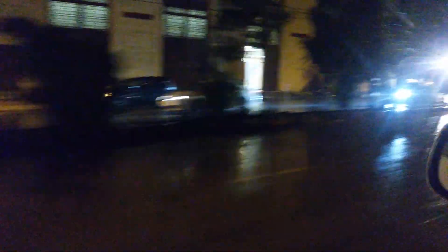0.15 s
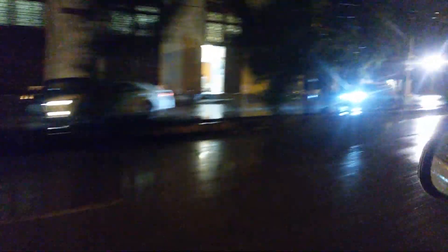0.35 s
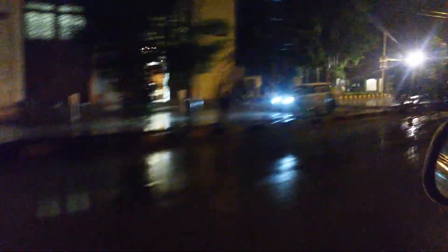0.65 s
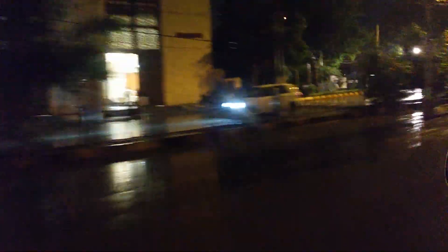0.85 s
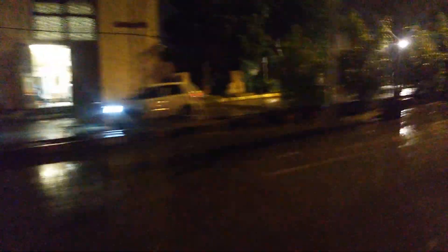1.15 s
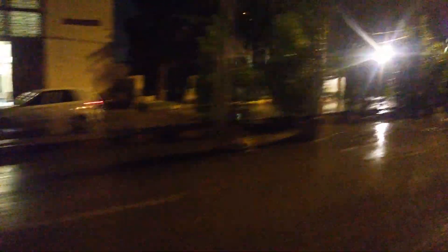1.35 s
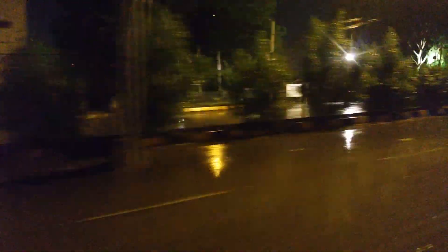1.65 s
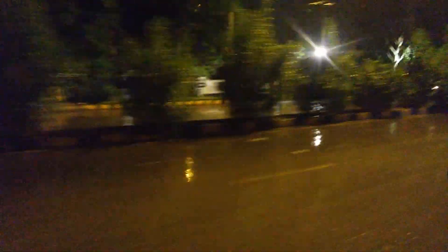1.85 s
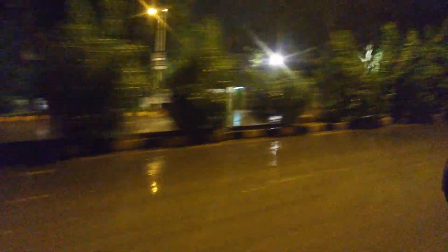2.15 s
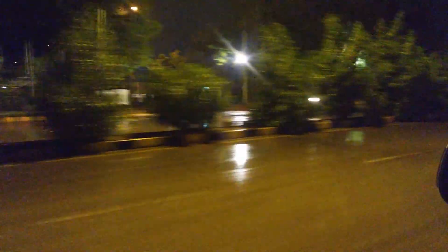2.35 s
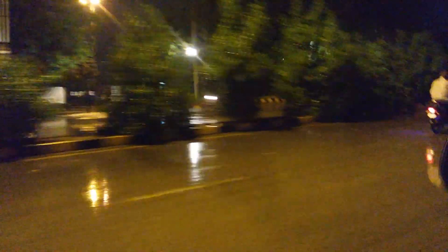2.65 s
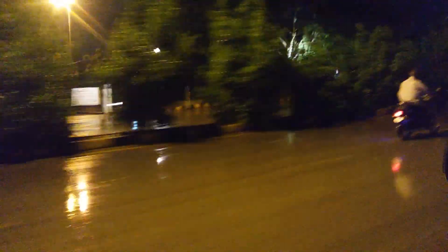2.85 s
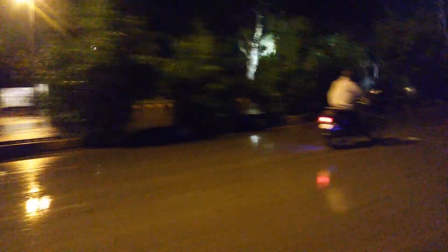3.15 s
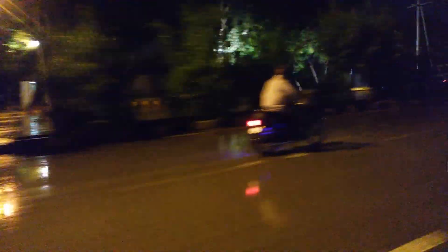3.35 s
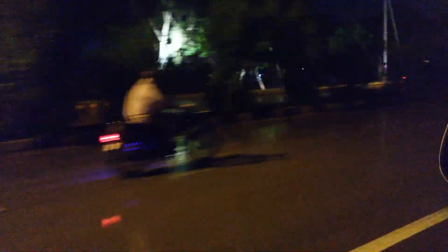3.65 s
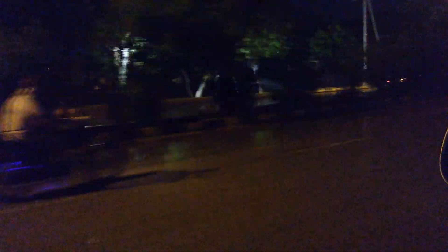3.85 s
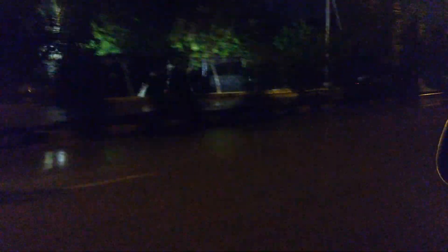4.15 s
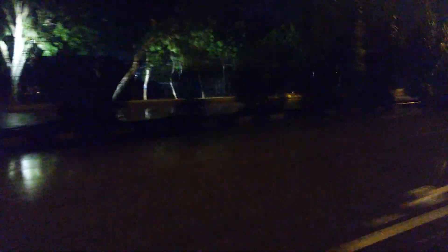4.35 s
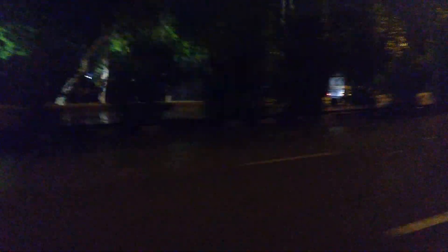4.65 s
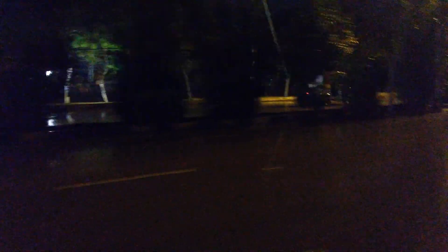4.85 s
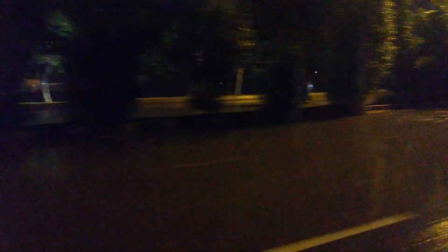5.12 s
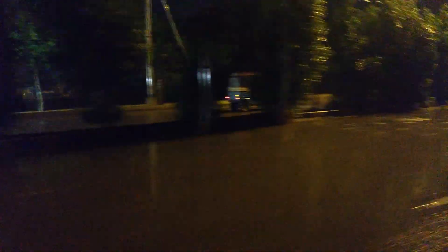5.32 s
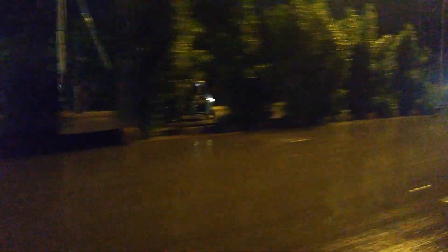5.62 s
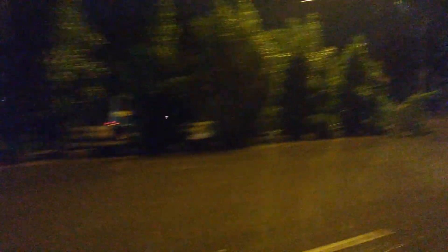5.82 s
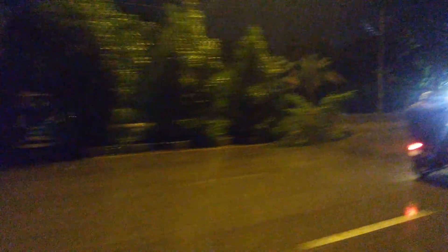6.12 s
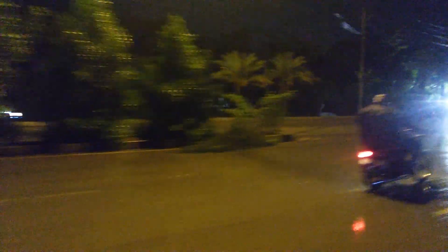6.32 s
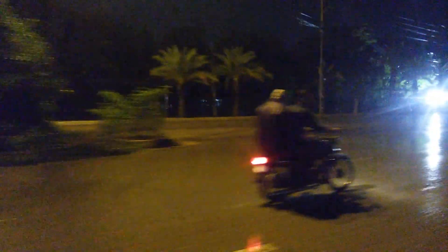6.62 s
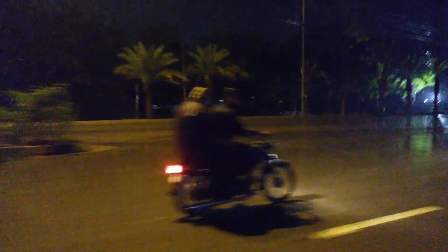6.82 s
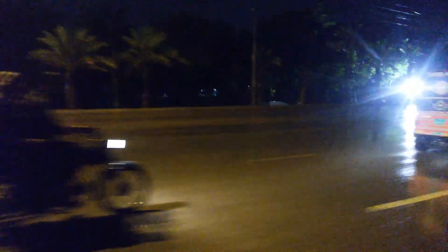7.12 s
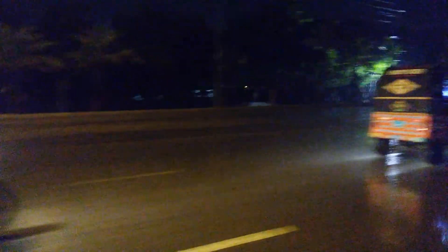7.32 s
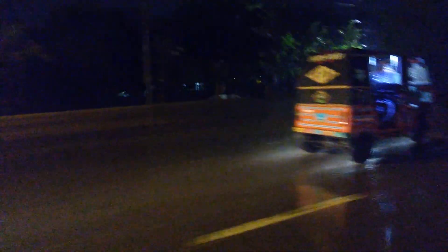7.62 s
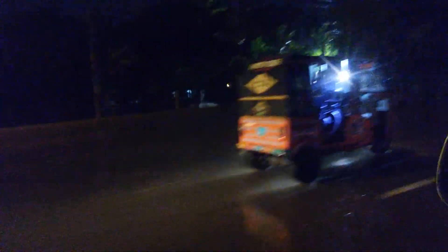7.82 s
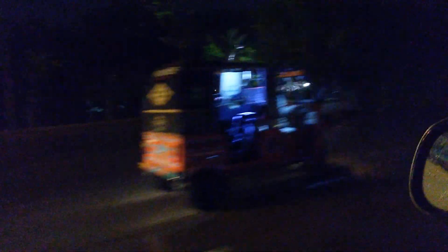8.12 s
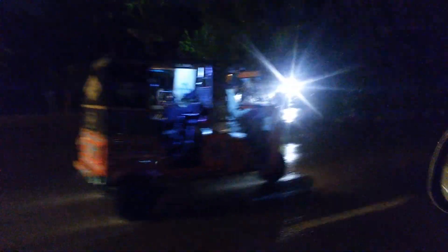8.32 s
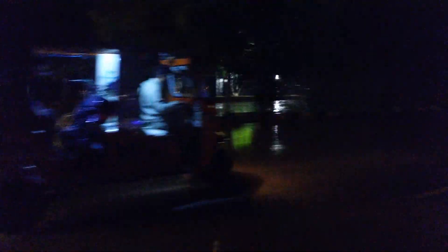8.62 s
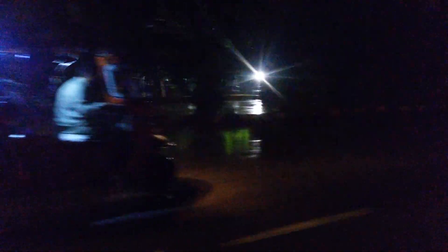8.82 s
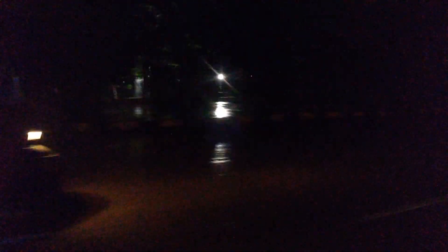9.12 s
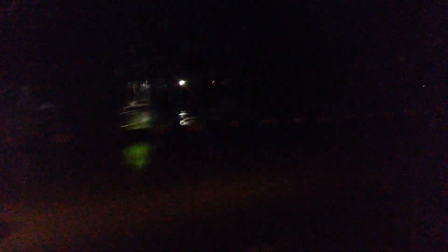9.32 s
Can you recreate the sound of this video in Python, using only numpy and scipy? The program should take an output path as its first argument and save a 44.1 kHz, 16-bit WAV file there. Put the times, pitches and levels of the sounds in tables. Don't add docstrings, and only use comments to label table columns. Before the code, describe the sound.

Wet-road driving heard very close and rough: air bursts slap and overload the microphone in quick clusters, with dry drop ticks and dense crackle inside them. Beneath runs continuous tyre spray, tread roar and dull rumble. After a short lull the gusts return, thinning gradually. A rapid small-engine putter then grows alongside, its valve gear clanking brightly and pulsing the hiss, still close when it ends.

```python
import sys
import numpy as np
from scipy import signal
from scipy.fft import rfft, irfft, next_fast_len
from scipy.io import wavfile
from scipy.ndimage import uniform_filter1d, map_coordinates

SR = 44100
rng = np.random.default_rng(int(sys.argv[2]) if len(sys.argv) > 2 else 0)


def inscribe(sig):
    pcm = np.round(np.clip(np.atleast_2d(sig).T, -1, 1) * 32767)
    wavfile.write(sys.argv[1], SR, pcm.astype(np.int16))


def convert_level_to_amplitude(level_db):
    exponent = np.asarray(level_db, float) / 20
    return 10 ** exponent


N = 417627


def unit(x):
    return x / np.sqrt(np.mean(x ** 2) + 1e-20)


def curves(rows):
    s, *columns = np.transpose(rows)
    return [np.interp(np.arange(N) / SR, s, column) for column in columns]


def wobble(rate):
    knots = rng.standard_normal(int(N * rate / SR) + 4)
    return map_coordinates(knots, [np.arange(N) * rate / SR])


def filtered(x, response):
    m = next_fast_len(N + 8192)
    return irfft(rfft(x, m) * response(np.fft.rfftfreq(m, 1 / SR)), m)[:N]


def rush(spectrum, patchy_db):
    z = signal.stft(rng.standard_normal(N + 512), nperseg=512)[2]
    field = uniform_filter1d(rng.standard_normal(z.shape), size=5, axis=0)
    field = uniform_filter1d(field, size=9, axis=1)
    x = signal.istft(z * convert_level_to_amplitude(patchy_db * unit(field)), nperseg=512)[1][:N]
    f, db = np.transpose(spectrum)
    return unit(filtered(x, lambda hz: convert_level_to_amplitude(np.interp(np.log(hz + 1), np.log(f + 1), db))))


def evened(x, size, share):
    power = np.abs(uniform_filter1d(x ** 2, size=size)) + 1e-3
    return unit(x / power ** (np.clip(share, 0, 1) / 2))


def powers(rows):
    low, high = np.zeros((2, N))
    for s, rise, fall, db, bright_db in rows:
        start = max(round((s - 4 * rise) * SR), 0)
        stop = min(round((s + 4 * fall) * SR), N)
        i = np.arange(start, stop)
        u = (i / SR - s) / np.where(i / SR < s, rise, fall)
        shape_db = -8.5 * np.abs(u) ** 1.51
        whole = 1 + convert_level_to_amplitude(2 * bright_db)
        low[i] += convert_level_to_amplitude(2 * (db + shape_db)) / whole
        high[i] += convert_level_to_amplitude(2 * (db + bright_db + 1.33 * shape_db)) / whole
    return np.array([low, high])


def rings(rows, cycles, gain_db):
    before, after = 400, 900
    s, db, hz = np.transpose(rows)[..., None]
    t = np.arange(-before, after) / SR
    u = t * hz / cycles
    shape = np.exp(np.where(u < 0, -12 * u * u, -2.5 * np.abs(u)))
    wave = convert_level_to_amplitude(db + gain_db) * shape * np.sin(2 * np.pi * (hz * t + rng.random(s.shape)))
    at = (np.round(s * SR) + np.arange(before + after)).astype(int)
    return np.bincount(at.ravel(), wave.ravel(), N + 2000)[before:N + before]


def eddies():
    # (time [s], fall [s], peak [dB], bright part [dB])
    slams = [(0.167, 0.02, 1.5, -1), (.311, 0.0097, -13, -12), (0.433, .03, -7.5, -3),
             (0.503, 0.0077, -2, -9), (0.67, 0.011, -6.5, -1), (.782, 0.023, -7, -20),
             (.899, 0.018, -14, -20), (1.052, 0.028, 3, 2.5), (1.229, 0.021, -10, -6),
             (1.61, 0.0083, -0.5, -1.5), (1.793, 0.017, -4.5, -3), (1.888, 0.013, -4.5, -4),
             (2.054, 0.025, -7, -12), (2.099, 0.018, 0.5, 0.5), (2.187, 0.018, -4.5, -9),
             (2.484, 0.026, -1, -6.5), (2.873, 0.012, -9.5, -13), (2.926, 0.024, -0.5, -4),
             (3.33, 0.034, 0.5, -2.5), (4.289, 0.01, -8, -13), (5.679, 0.037, 2, -7),
             (5.855, 0.014, -10, -4), (6.172, 0.0097, -1.5, 0), (6.475, 0.033, -15.5, -1),
             (6.906, 0.026, -4.5, -7.5), (7.043, 0.014, -3, -7), (7.26, 0.024, -7.5, -4),
             (7.828, 0.015, -9.5, -3), (8.92, 0.017, -5, -15.5), (9.073, 0.019, -6.5, 8.5)]
    # (time [s], rise [s], peak [dB], bright part [dB])
    swells = [(.209, 0.011, -3.5, -3), (.357, 0.026, -2.5, -10), (0.401, 0.014, -2.5, -15),
              (.656, 0.016, -8.5, -10), (.881, 0.014, -13.5, -9), (1.146, 0.025, -6.5, -16),
              (1.328, 0.018, -3, -9), (1.354, 0.018, -7, -25), (1.496, 0.02, -3, -5.5),
              (2.46, 0.039, -10.5, -7), (2.542, .034, -5.5, -6), (2.608, 0.024, -3.5, -6),
              (2.785, 0.0045, -1, -6), (2.819, 0.027, -3.5, -7), (3.135, 0.024, -12.5, 2),
              (3.302, 0.024, 1.5, -2), (3.559, 0.019, -6, -7.5), (4.561, 0.0082, -2.5, -2.5),
              (4.589, 0.011, -5, -20), (4.895, 0.016, -10.5, -9), (5.243, 0.013, -6, -2),
              (5.275, 0.019, -7.5, -12), (5.762, 0.048, -3.5, -4.5), (5.882, 0.025, -7, -2),
              (6.335, 0.019, -0.5, -5.5), (7.108, 0.028, -12.5, -4), (7.58, 0.0086, -4, 4),
              (8.397, 0.014, -11, -6), (8.834, 0.059, -16, -21), (9.208, 0.015, -7.5, -11),
              (9.24, 0.009, -5.5, -13)]
    # (time [s], peak [dB], bright part [dB])
    puffs = [(0.821, -3, -18), (1.009, -7.5, -17), (1.182, -3, 0), (1.284, -3, -16), (1.676, -12, -9),
             (1.722, 1, 1), (1.813, -5.5, -7), (2.291, -9.5, -8), (2.425, 4, -0.5), (3.15, -5.5, -1),
             (3.175, -5.5, -8), (3.4257, 0.5, -0.5), (4.142, -22, -18), (4.206, -6.5, -8.5),
             (4.265, -5, -11.5), (4.531, 2, -16), (4.78, -5, 0), (4.816, -5.5, -23), (5.071, -5, -11),
             (5.089, -3.5, -7), (5.538, 2, -1), (5.619, -8, -11), (5.803, -2.5, -8), (6.084, -7, -23),
             (7.07, -8, -8.5), (7.406, -8, -6), (7.531, -9, -2), (8.7, -6.5, -13.5), (8.72, -5, -26),
             (8.952, -9.5, -25)]
    # (time [s], peak [dB])
    flutters = [(0.034, -13.5), (.083, -21.5), (.125, -14), (.598, -16.5), (1.426, -11), (1.937, -10.5),
                (2.977, -19.5), (4.18, -19), (4.324, -14), (4.407, -14.5), (4.843, -12), (4.95, -13.5),
                (5.145, -11.5), (5.636, -12), (5.82, -10.5), (5.97, -12), (6.279, -18), (6.447, -15),
                (6.588, -13.5), (6.7, -22), (6.75, -20.5), (7.335, -13), (7.366, -16.5), (7.43, -10),
                (7.763, -14.5), (8.362, -16), (8.55, -17.5), (9.024, -21.5), (9.052, -9.5), (9.355, -12)]
    rows = [(s, 0.0052 + 0.067 * fall, fall, db, bright) for s, fall, db, bright in slams]
    rows += [(s, rise, 0.01 + 0.22 * rise, db, bright) for s, rise, db, bright in swells]
    rows += [(s, 0.0066, 0.0087, db, bright) for s, db, bright in puffs]
    rows += [(s, 0.014, 0.014, db, -10) for s, db in flutters]
    return rows


def buffeting(low, high):
    # (frequency [Hz], density [dB per Hz])
    thump_spectrum = [(50, -60), (120, -14), (200, -3.5), (280, -2.5), (450, -6.5), (800, -20.5),
                      (2000, -62)]
    # (frequency [Hz], density [dB per Hz])
    rasp_spectrum = [(200, -21), (500, 1), (800, -0.5), (1400, -8), (2500, -20.5), (5000, -28), (9000, -92)]
    # (frequency [Hz], density [dB per Hz])
    boom_spectrum = [(15, -29), (40, -15), (110, -3.5), (170, -8.5), (400, -68)]
    # (time [s], peak [dB])
    heaves = [(.171, -20), (.373, -19), (.434, -23), (.674, -20.5), (.77, -21.5), (.907, -26), (1.056, -18),
              (1.195, -21.5), (1.297, -16.5), (1.429, -24), (1.478, -20), (1.612, -25.5), (1.717, -27),
              (1.898, -23.5), (1.944, -26), (2.103, -20), (2.474, -21.5), (2.819, -39), (2.926, -27),
              (3.124, -16), (3.295, -38), (3.434, -27), (3.547, -23), (4.268, -21.5), (4.527, -23.5),
              (4.816, -21), (4.977, -26), (5.246, -25.5), (5.43, -38), (5.537, -22.5), (5.675, -21.5),
              (5.724, -23), (5.853, -18), (6.165, -36), (6.307, -34), (6.482, -19), (6.581, -23),
              (6.911, -19.5), (7.369, -25), (7.585, -33), (7.822, -25), (8.364, -33), (8.705, -30),
              (8.829, -26), (8.944, -25), (9.059, -36), (9.198, -34)]
    heave_s = 0.017
    thump = evened(rush(thump_spectrum, patchy_db=4.5), size=260, share=0.79)
    rasp = evened(rush(rasp_spectrum, patchy_db=1.5), size=130, share=0.21) * convert_level_to_amplitude(3.2 * wobble(260))
    boom = evened(rush(boom_spectrum, patchy_db=1.5), size=900, share=1.0)
    t = np.arange(N) / SR
    lull_db = 6.5 * ((t > 3.1) & (t < 4.12))
    pump_db = -34 - uniform_filter1d(lull_db, size=4000)
    pushes = powers([(s, heave_s, heave_s, db + 5.5, -60) for s, db in heaves])[0]
    deep = convert_level_to_amplitude(2 * pump_db) + pushes
    return convert_level_to_amplitude(-1.5) * np.sqrt(low) * thump + convert_level_to_amplitude(-1.0) * np.sqrt(high) * unit(rasp) + np.sqrt(deep) * boom


def snaps():
    # (time [s], peak [dB])
    jumps = [(0.162, 7), (0.403, -10), (0.4315, -4.5), (0.498, -9), (0.6703, -5), (1.0474, 3.5),
             (1.313, -4.5), (1.725, -5.5), (1.7907, -3), (2.095, 5.5), (2.424, -7), (2.48, -1.5),
             (2.499, -1.5), (2.534, 0), (2.7903, -6), (2.803, 0.5), (2.927, 1), (3.298, 0), (3.302, 0.5),
             (3.3323, -1), (3.555, -6), (4.561, -4), (5.0843, -19), (5.2386, -3), (5.5346, 0.5),
             (5.6794, 1.5), (5.6994, -4), (6.169, -5), (6.32, -5.5)]
    out, t = np.zeros(N + 600), np.arange(600) / SR
    ragged = rush([(400, -14), (1200, 11), (2500, 0.5), (4500, 1.0), (9000, -48.0)], patchy_db=2.0)
    for (s, db), (pitch, phase) in zip(jumps, rng.random((len(jumps), 2))):
        start = round(s * SR)
        hz = 3200 * 2 ** (.8 * (pitch - .5)) * np.exp(-t / 0.00161) + 900
        swing = convert_level_to_amplitude(-60 * t / 0.027) * np.sin(2 * np.pi * (np.cumsum(hz) / SR + phase))
        tail = 0.61 * convert_level_to_amplitude(-60 * t / 0.023) * ragged[start:][:600]
        onset = 1 - np.exp(-t / 0.00094)
        out[start:][:600] += convert_level_to_amplitude(db - 0.5) * onset * (swing + tail)
    return out[:N]


def cracks():
    # (time [s], peak [dB], pitch [Hz])
    tears = [(0.1791, -14, 1500), (0.2087, -10, 1200), (0.3934, -5, 1400), (0.4442, -6, 1600),
             (1.0414, -5, 1300), (1.0563, 7, 1500), (1.0665, -11, 1400), (1.0749, -5, 1590),
             (1.181, -14, 1300), (1.1864, -4, 1200), (1.3225, -7, 1500), (1.6082, -1, 1300),
             (1.7195, -8, 1200), (1.8034, -3, 1500), (1.8093, -14, 1700), (1.8967, -7, 1200),
             (2.1109, -12, 1500), (2.4312, -8, 1700), (2.4919, -4, 1400), (2.4963, 7, 1300),
             (2.8128, -10, 1700), (2.8213, -5, 1600), (2.9192, 0, 1200), (2.9423, -9, 1500),
             (3.1714, -10, 1400), (3.2881, -9, 1300), (3.3105, -2.5, 1600), (3.3186, -16, 1600),
             (3.3422, 2, 1700), (4.2661, 0, 1500), (4.5272, 3.5, 1390), (4.7729, -8, 1390),
             (4.7791, -7, 1270), (5.0751, -1, 1290), (5.2466, 0, 1780), (5.2673, -5, 1200),
             (5.5411, -15, 1500), (5.6895, -13, 1400), (5.7585, 0, 1600), (5.7683, -3, 1300),
             (6.3325, -21, 1600), (6.9174, -16, 1400), (6.9317, -19, 1400), (6.9391, -4, 1190),
             (7.2596, -19, 1600), (7.2661, -18, 1400), (7.4022, -13, 2000), (7.5333, -9, 1600),
             (7.826, -20, 1600), (7.8314, -18, 1700), (8.527, -6, 2100), (8.9257, -4, 1500),
             (8.9546, -6, 1500), (9.0224, -6, 2100), (9.0533, -9, 1600), (9.0697, -21, 1600),
             (9.076, -23, 1400), (9.0818, -9, 1600), (9.196, -7, 1600), (9.2366, -6, 1700)]
    return rings(tears, cycles=1.5, gain_db=4.0)


def knocks():
    # (time [s], peak [dB])
    dull = [(0.062, -16), (0.313, -10), (0.45, -7), (0.899, -8), (1.067, -2), (1.677, -11), (1.772, -18),
            (1.791, -5), (2.46, -12), (3.554, -19), (3.588, -15), (4.142, -9.5), (4.177, -11), (4.191, -14),
            (4.843, -20), (4.964, -14), (5.907, -14), (6.279, -18), (6.697, -17), (7.375, -18),
            (7.456, -16), (8.199, -20), (8.236, -22), (8.334, -16), (8.531, -16), (9.052, -10),
            (9.122, -18), (9.156, -25), (9.364, -16)]
    # (time [s], peak [dB], pitch
    # [Hz])
    jolts = [(.2085, 8, 880), (.8178, -3.5, 695), (.8245, -3, 550), (.896, -16, 450), (.902, -16, 450),
             (1.32, 5.5, 800), (1.6075, -12, 800), (1.884, -1, 800), (2.87, -10, 900), (3.3195, -5, 3500),
             (3.4293, 1, 2650), (3.556, -0.5, 750), (4.526, 8, 800), (5.0675, -19, 800), (5.2375, 6, 940),
             (5.745, -15, 900), (5.853, -3, 448), (6.17, 1, 604), (6.4, -3, 3600), (6.918, -2, 900),
             (7.266, -11, 900)]
    knock_hz = 314
    thuds = rings([(s, db, knock_hz) for s, db in dull], cycles=1.8, gain_db=6.5)
    return thuds + rings(jolts, cycles=1.5, gain_db=3.0)


def crackle(low):
    hits_per_s, top_hz = 380, 3000
    at = rng.integers(0, N, int(hits_per_s * N / SR))
    sign, strength = rng.random((2, len(at)))
    level = convert_level_to_amplitude(6.5 + 10 * strength) * np.sqrt(np.minimum(low[at], .5))
    hits = np.bincount(at, np.sign(sign - .5) * level, N)
    return filtered(hits, lambda hz: 1j * hz / (500 + 1j * hz) / (1 + 1j * hz / top_hz) ** 2)


def tyres(beat, wind):
    # (time [s], level [dB])
    road = [(0, -22.5), (.3, -21), (.56, -27.5), (.61, -20.5), (.87, -23), (1.27, -19.5), (1.6, -25),
            (2.2, -22.5), (2.55, -24), (3.2, -22.5), (4.09, -27), (4.11, -23), (4.75, -24), (5.45, -24.5),
            (6.0, -23.5), (7.5, -18.5), (8.1, -20), (9.47, -19.5)]
    # (time [s], level [dB])
    alongside = [
        (2.6, -1),
        (3.3, 1.5),
        (5.4, 0.5),
        (6.0, 3),
        (6.4, -0.5),
        (6.6, 2),
        (7.3, 0),
        (8.25, 5),
        (9.47, 3),
    ]
    # (frequency [Hz], density [dB per Hz])
    spray_spectrum = [(2000, -21.5), (3200, -33), (4100, -7.5), (4550, -1), (5200, -2), (7000, -14.5),
                      (9000, -23), (10500, -18.5), (11800, -24), (13200, -18), (14000, -38), (15000, -69)]
    tread_spectrum = [(350, -12.5), (700, -8), (900, -9.5), (1200, -1.5), (1550, -5.5), (1900, -3.5),
                      (2400, -2.5), (2900, -5), (3600, -6), (4200, -11), (6000, -34)]
    rumble_spectrum = [(40, -46), (120, -4.5), (200, -1), (300, 0), (430, -4.5), (600, -14.5), (800, -14),
                       (1050, -18.5), (1800, -95)]
    tread_db, = curves(road)
    spray_db = tread_db - 0.97 + curves(alongside)[0]
    span_s = 0.12
    wind_db = 10 * np.log10(np.abs(uniform_filter1d(wind, size=int(span_s * SR))) + 0.0011)
    rumble_db = -23.5 + 0.27 * (wind_db - wind_db.mean())
    sway = wobble(7.8)
    droplets = convert_level_to_amplitude(0.2 * wobble(60) + 0.35 * wobble(300))
    spray = convert_level_to_amplitude(spray_db + 0.38 * sway + beat) * unit(droplets * rush(spray_spectrum, patchy_db=2.0))
    tread = convert_level_to_amplitude(tread_db + 1.0 + 0.5 * sway + 0.089 * beat) * rush(tread_spectrum, patchy_db=1.5)
    body = evened(rush(rumble_spectrum, patchy_db=3.5), size=500, share=0.22)
    return spray + tread + convert_level_to_amplitude(rumble_db + 0.96 * wobble(25)) * body


def engine():
    # (time [s], exhaust [dB], clatter depth [dB], valve tick [dB])
    putter = [
        (6.0, -55, 0., -50),
        (6.5, -38, 1.2, -32),
        (7.1, -32, 1.2, -31),
        (7.5, -29, 1.5, -28),
        (7.9, -22, 1.4, -31),
        (8.7, -22, 1.3, -32),
        (9.47, -23.5, 1.3, -32),
    ]
    # (time [s], rate [Hz])
    firing = [
        (7.5, 30.87),
        (7.9, 30.6),
        (8.2, 30.6),
        (8.5, 30.33),
    ]
    # (frequency [Hz], width [Hz], level [dB])
    exhaust = [(135, 70, -14), (245, 22, -5), (276, 22, 1), (308, 22, -4), (340, 22, -7), (440, 30, -7),
               (877, 50, -12)]
    level_db, depth_db, tick_db = curves(putter)
    turns = np.cumsum(curves(firing)[0]) / SR + .96
    at = np.flatnonzero(np.diff(np.floor(turns)))
    first, second = rng.standard_normal((400, 2))[:len(at)].T
    pulses, taps = np.zeros((2, N))
    pulses[np.clip(at + (5 * first).astype(int), 0, N - 1)] = convert_level_to_amplitude(1.5 * second)
    taps[np.clip(at + 130 + (40 * second).astype(int), 0, N - 1)] = convert_level_to_amplitude(3 * first)

    def resonance(f, centre, width):
        return 1j * f * width / (centre * centre - f * f + 1j * f * width)

    def pipe(f):
        total = sum((-1) ** k * convert_level_to_amplitude(db) * resonance(f, c, w) for k, (c, w, db) in enumerate(exhaust))
        return total / (1 + 1j * f / 1500) ** 2

    muffled = filtered(pulses, pipe)
    metal = rush([(3500, -23), (4700, 1.0), (5300, 6.5), (6200, 2.0), (7600, -9.5), (9000, -50.0)],
                 patchy_db=7.5)
    rattle = uniform_filter1d(signal.lfilter([1], [1, -.988], taps), size=24) * metal
    beat = np.cos(2 * np.pi * (turns - .12)) + 0.089 * np.cos(4 * np.pi * (turns - .1))
    facing = np.exp(-((np.arange(N) / SR - 7.85) / .4) ** 2)
    panel = convert_level_to_amplitude(-30) * facing * unit(filtered(pulses, lambda hz: resonance(hz, 870, 70) ** 2))
    return convert_level_to_amplitude(level_db) * unit(muffled) + panel + convert_level_to_amplitude(tick_db) * unit(rattle), beat * depth_db


def clanks():
    # (time [s], peak [dB], pitch [Hz])
    strokes = [(6.548, -17, 5250), (6.58, -11, 5340), (6.742, -16, 5570), (6.774, -23, 5500),
               (6.87, -27, 6720), (6.937, -21, 5510), (7.033, -17, 5510), (7.169, -17, 4570),
               (7.2, -23, 4620), (7.261, -16, 4660), (7.33, -20, 4600), (7.362, -15, 4530),
               (7.388, -22, 6720), (7.42, -21, 6720), (7.484, -22, 7300), (7.52, -16, 5840),
               (7.526, -15, 4860), (7.58, -25, 5900), (7.615, -14, 5900), (7.68, -14, 5700),
               (7.843, -15, 5050), (7.975, -15, 4670), (8.011, -16, 4650), (8.107, -15, 4740),
               (8.271, -12, 5800), (8.301, -12, 4970), (8.6, -10, 4910), (8.726, -9, 5050),
               (8.892, -12, 5130), (8.995, -10, 4800), (9.356, -9, 5300)]
    on_cover = [row for row in strokes if 4500 < row[2] < 4800]
    return rings(strokes, cycles=15, gain_db=8.0) + rings(on_cover, cycles=70, gain_db=-7.0)


def ticks():
    # (time [s], peak [dB])
    drops = [(0.165, -9), (0.856, -7), (1.05, 4), (1.3225, -17.5), (1.7925, -21), (2.094, -13),
             (2.423, -13), (2.5, -14), (2.805, -18), (2.928, -17), (3.304, -15), (3.3425, -18), (3.429, 3),
             (5.535, -17), (6.4, -8), (6.621, -14)]
    s, db = np.transpose(drops)
    blows = np.bincount(np.round(s * SR).astype(int), convert_level_to_amplitude(db + 8), N)
    return filtered(blows, lambda hz: 1j * hz / (1500 + 1j * hz) / (1 + 1j * hz / 6000))


def scene():
    putter, beat = engine()
    low, high = powers(eddies())
    air = buffeting(low, high) + snaps() + cracks() + knocks() + crackle(low)
    return (air + tyres(beat, low) + putter + clanks() + ticks())[None]


def thinned(x):
    # (start [s], end [s], share of lines kept [0-1])
    spare = [(0, .15, .04), (.3, .7, .02), (2.2, 3.2, .008), (3.6, 4.2, .04), (4.2, 5.5, .012),
             (5.9, 6.8, .03), (6.8, 7.05, .03), (7.05, 7.43, .13), (7.6, 8.3, .016), (8.1, 9.6, .03),
             (8.4, 9.4, .13)]
    hz, t, z = signal.stft(x, SR, window="cosine", nperseg=2048)
    power = np.abs(z) ** 2
    usual = uniform_filter1d(uniform_filter1d(power, size=24, axis=1), size=5, axis=2)
    usual = np.abs(usual)
    extra = uniform_filter1d(sum(more * ((t > a) & (t < b)) for a, b, more in spare), size=9)
    luck_db = 6 * rng.standard_normal((65, len(t))).repeat(16, 0)[:len(hz)]
    share = (.006 + extra) * convert_level_to_amplitude(luck_db)
    share = share / (1 + (power.sum(1) / convert_level_to_amplitude(2 * -12.5)) ** 2)
    strict = np.interp(hz, [7600, 8600, 9600, 11800, 12800, 13500, 14000],
                       [0, .3, .8, 1.6, 1, 1.2, 6])[:, None]
    strict = strict + 20 * np.outer(hz > 12100, (t > 7.53) & (t < 8.1))
    keep = power >= -np.log(np.clip(share, 1e-4, 1)) * strict * usual
    return signal.istft(z * keep, SR, window="cosine", nperseg=2048)[1][:, :N]


def holed(x):
    treble_hz = 8800
    hz, t, z = signal.stft(x, window="cosine", fs=SR, nperseg=256)
    power = np.abs(z) ** 2
    usual = np.abs(uniform_filter1d(uniform_filter1d(power, size=9, axis=1), size=5, axis=2))
    keep = (power >= .9 * usual) | (hz < treble_hz)[:, None]
    gain = convert_level_to_amplitude(-2.0 * (hz > treble_hz))[:, None]
    return signal.istft(gain * z * keep, window="cosine", fs=SR, nperseg=256)[1][:, :N]


def band_limit(x):
    return signal.sosfilt(signal.butter(12, 14560, fs=SR, output="sos"), x)


def record(dry):
    # (time [s], length [s])
    short_frames = [(.16, .016), (.28, .022), (.402, .028), (.834, .03), (.897, .023), (1.043, .03),
                    (2.094, .013), (2.421, .016), (2.479, .02), (2.798, .019), (2.923, .017), (3.331, .015),
                    (3.423, .009), (5.236, .01), (5.532, .015), (5.666, .022), (6.38, .026)]
    over = np.maximum(np.abs(dry) - .95, 0)
    keep = np.exp(-1 / (.12 * SR))
    late = np.pad(over, ((0, 0), (600, 0)))[:, :N]
    duck = signal.lfilter([1 - keep], [1, -keep], late)
    x = dry / (1 + 22.2 * duck)
    x = x / (1 + np.abs(x) ** 30) ** (1 / 30)
    t = np.arange(N) / SR
    short = 1. * sum((t > s) & (t < s + length) for s, length in short_frames)
    short = uniform_filter1d(uniform_filter1d(short, size=60), size=60)
    mix = np.clip(short * holed(x) + thinned((1 - short) * x), -1, 1)
    return band_limit(mix)


dry = scene()
out = record(dry)
inscribe(out)
```